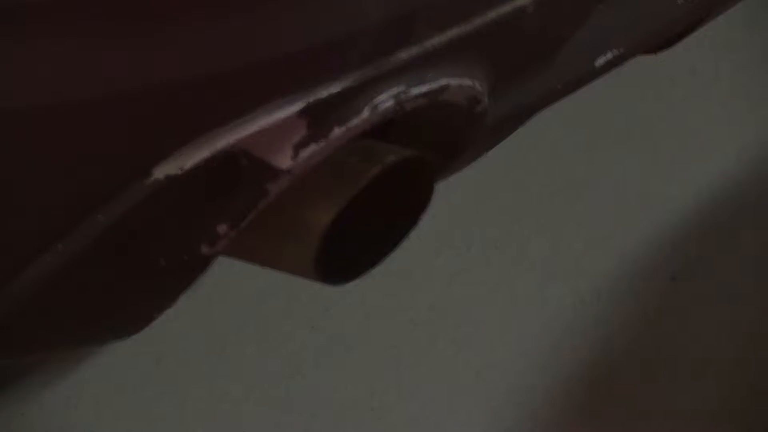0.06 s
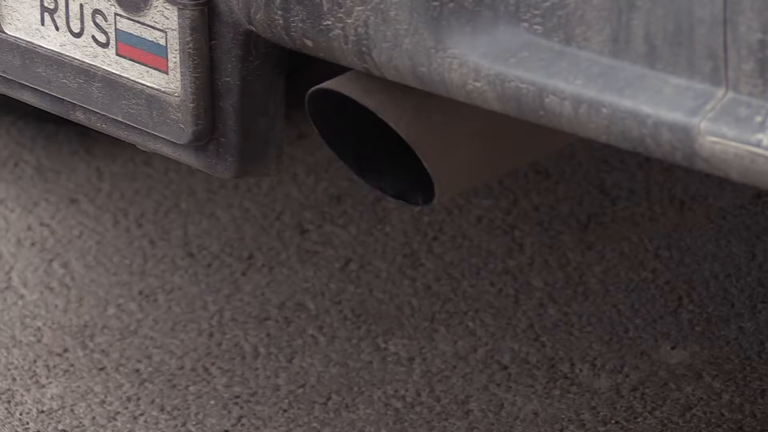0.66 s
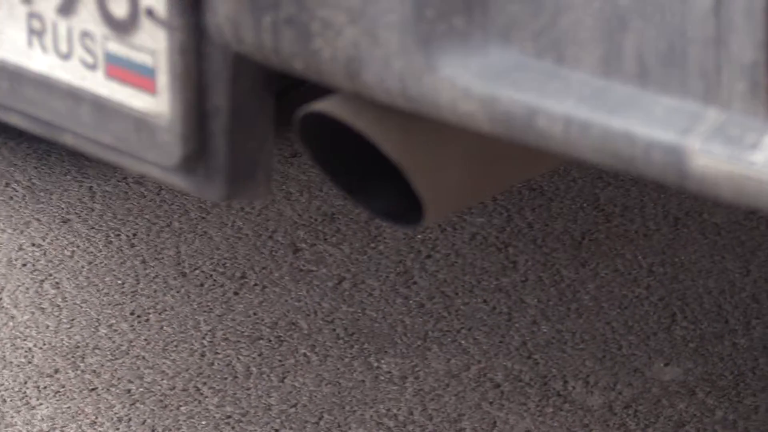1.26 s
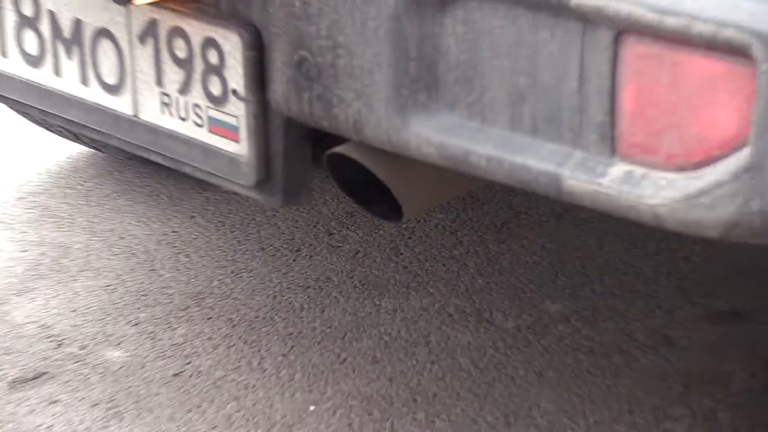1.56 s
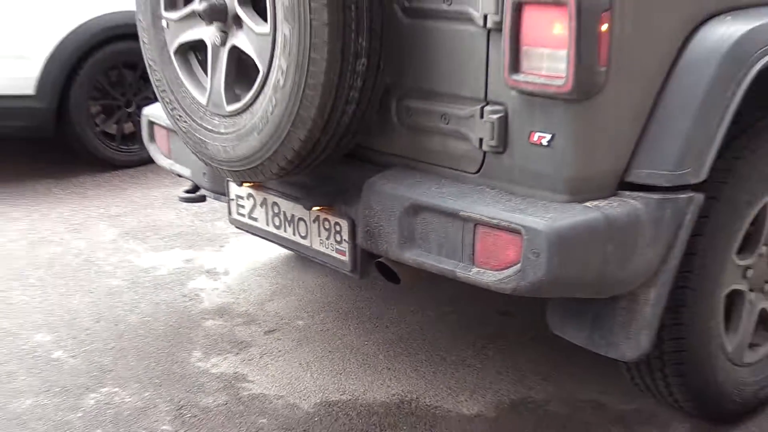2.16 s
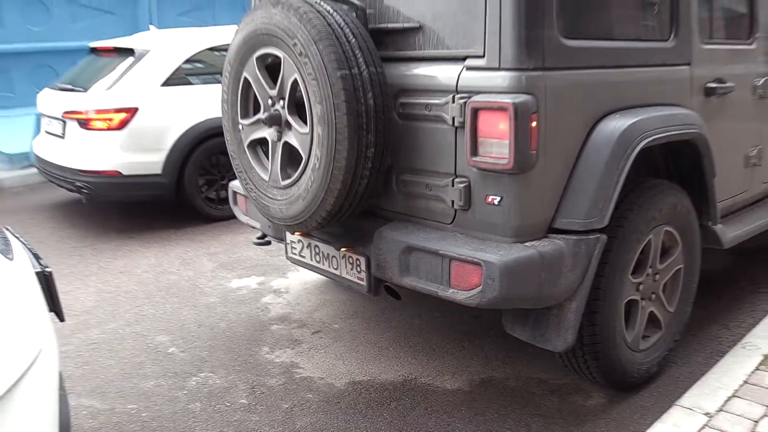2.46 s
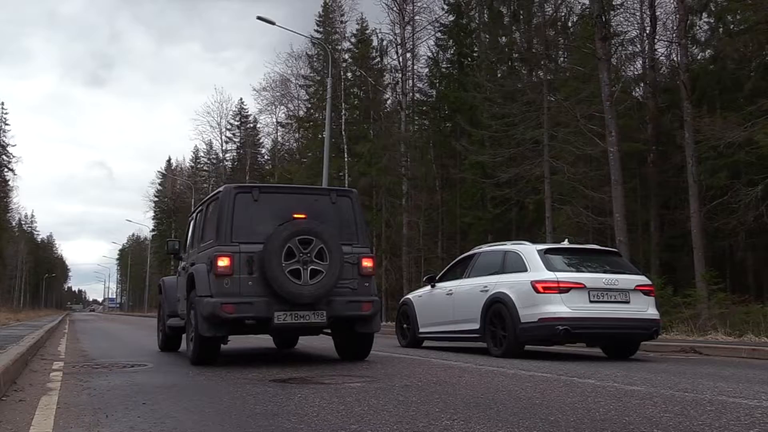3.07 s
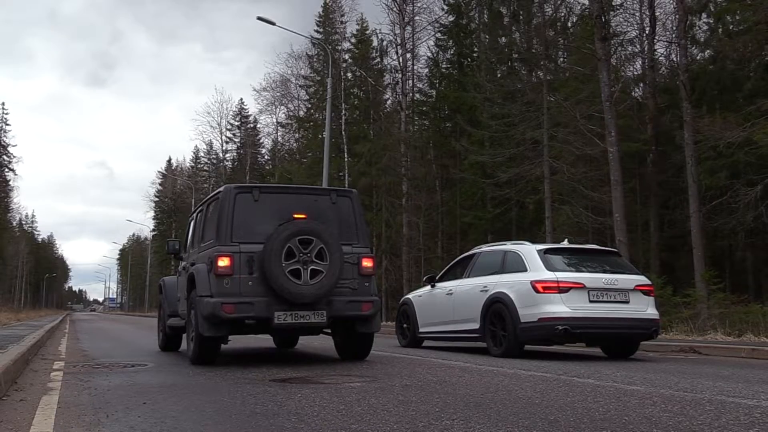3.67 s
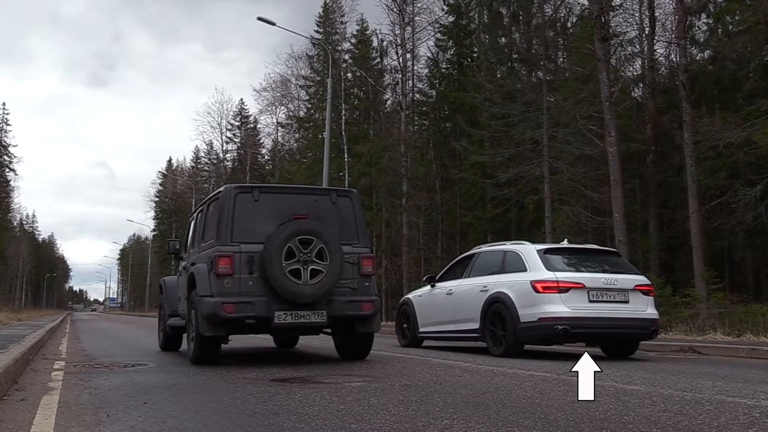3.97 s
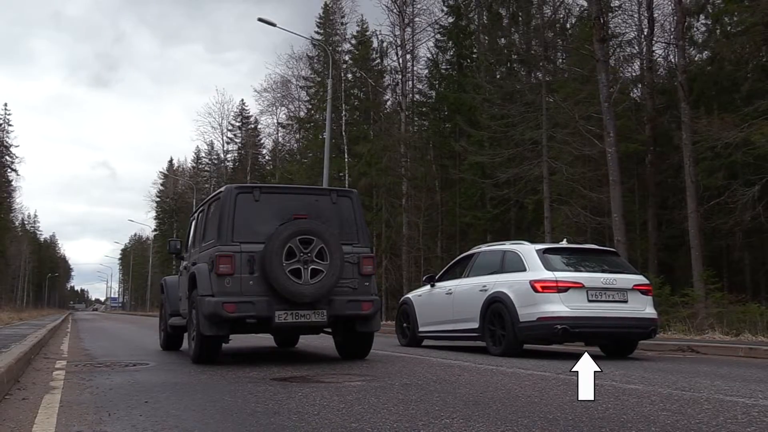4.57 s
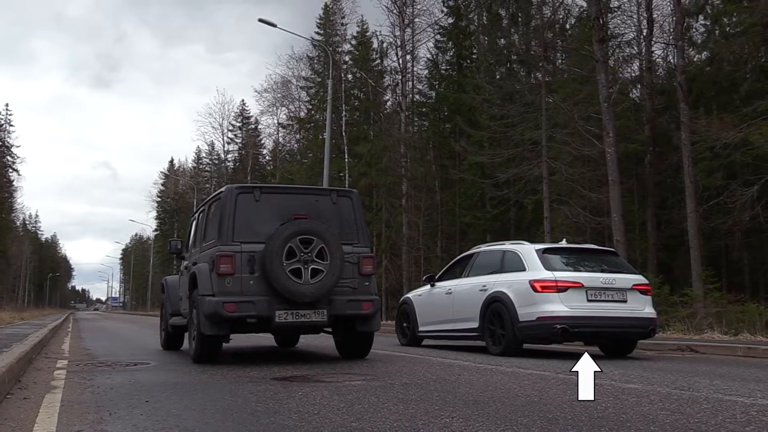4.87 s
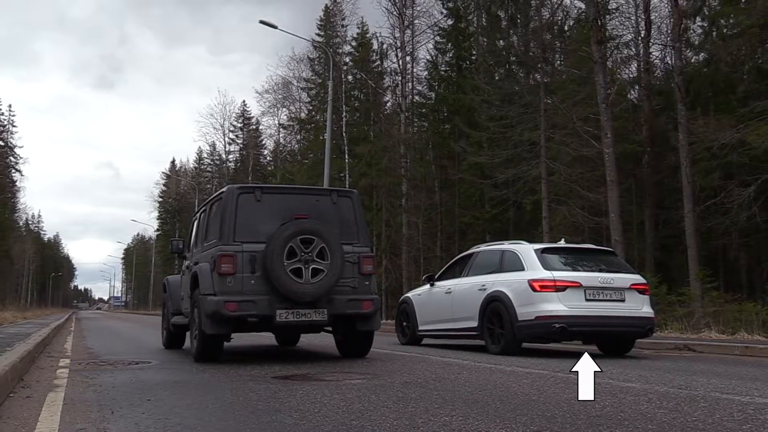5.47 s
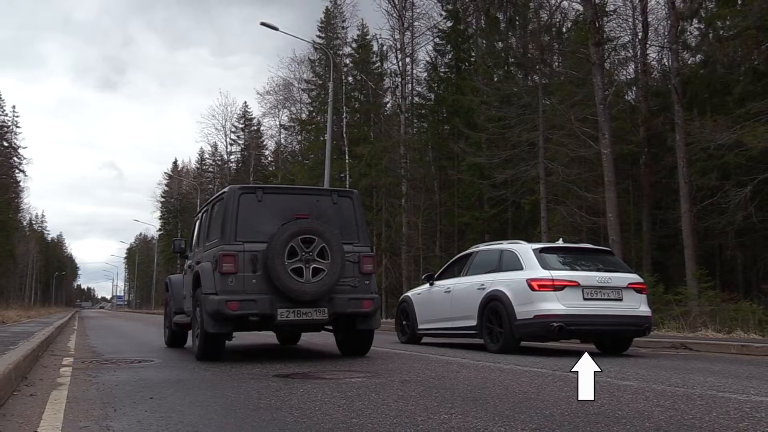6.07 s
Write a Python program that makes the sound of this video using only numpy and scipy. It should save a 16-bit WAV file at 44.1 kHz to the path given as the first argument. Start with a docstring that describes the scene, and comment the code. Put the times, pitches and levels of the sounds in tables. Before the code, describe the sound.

A loud four-cylinder car with an open exhaust idles in a garage, a deep, round throb over an even rush of gas. At about 0.6 seconds it cuts abruptly to a faster, crackling idle close to another tailpipe, with a few harder cracks. At 2.9 seconds another cut leads to a forest road and a quieter, slower idle, softly thudding with a faint whine, heard from farther back. At 3.7 seconds the engine revs with a boom and a bark, peaking near 4.2 seconds, then sinks, with a brief faint whine around 4.8. A second, higher rev starts at 5.2 seconds and peaks near 5.7. Both carry a thin, fuzzy turbo whistle and hiss, the second with a few tiny air spits. One exhaust pop sounds at 5.8 seconds, lightly echoed by the trees, and the engine winds down until about 6.3 seconds.

```python
"""A deep idle throbs in a garage. Cut to a fast, crackling idle at the tailpipe. Cut to a forest road:
a slow idle, revved twice, with turbo whistle and one pop as the throttle shuts the second time.
All three are turbocharged four-cylinder cars with open exhausts. At idle each firing kicks the pipe
and puffs out turbulent gas; in the revs, harmonics of the firing rate sweep the pipe's resonances."""
import sys
import numpy as np
from scipy import signal
from scipy.fft import rfft, irfft, next_fast_len
from scipy.io import wavfile
from scipy.ndimage import uniform_filter1d, minimum_filter1d

SR = 44100
rng = np.random.default_rng(int(sys.argv[2]) if len(sys.argv) > 2 else 0)


def wav_record(signal):
    """Record a signal, one row per channel, as 16-bit PCM in the file named by sys.argv[1]."""
    frames = np.transpose(np.atleast_2d(signal))
    bounded = np.clip(frames, -1, 1)
    # unit amplitude maps onto the largest positive 16-bit level
    quanta = np.round(bounded * 32767).astype(np.int16)
    wavfile.write(sys.argv[1], SR, quanta)


N = 279147
T = np.arange(N) / SR
MID_FIRING_HZ = 80

# exhaust pulse spectra: freq_hz, gain_db
GARAGE_PULSE = [(20, -71), (41, -13), (82, -0.5), (124, 7.5), (165, 7.5), (206, -6.5), (248, -16),
                (300, -29.5), (480, -29.5), (630, -22), (5000, -115)]
FAST_PULSE = [(25, -55.5), (48, -23.5), (96, 0), (144, -2), (192, 3.5), (240, -2), (288, -17), (336, -12.5),
              (384, -16), (450, -28), (730, -22.5), (816, -19), (930, -22.5), (1008, -22.5), (1080, -44),
              (1310, -32), (1600, -37), (1780, -30.5), (2100, -67), (10000, -115)]
SLOW_PULSE = [(25, -38), (51, -9.5), (100, -4.5), (155, 2), (200, -5.5), (270, -12), (330, -2),
              (420, -35.5), (1100, -25), (9000, -110)]
POP_PULSE = [(40, -5), (250, 14.5), (700, 4), (1500, -31), (5000, -59)]
# exhaust gas noise spectra: freq_hz, density_db
GARAGE_GAS = [(20, -20), (130, 5), (300, -6.5), (480, -11.5), (740, -10), (920, -16), (2000, -21),
              (8500, -37.5), (15000, -51)]
FAST_GAS = [(20, -5.5), (100, -1.5), (370, 1), (500, -5.5), (1150, -7.5), (2500, -18.5), (4600, -24.5),
            (6000, -31.5), (10500, -34), (15000, -46)]
SLOW_GAS = [(35, -24.5), (70, 14.5), (160, 13.5), (250, -3.5), (350, 2), (600, -7.5), (1900, -10.5),
            (4000, -24), (9300, -39), (14000, -56)]
REV_GAS = [(30, -15), (150, 15.5), (2400, -3.5), (4200, -11), (5500, -13), (7000, -22), (10000, -32),
           (14500, -48)]
BURBLE_GAS = [(30, -28), (130, 3), (350, 7.5), (700, 0.5), (1250, -10), (6000, -64)]
# resonances in the gas noise: centre_hz, width_hz, lift_db
GARAGE_RESONANCES = [(2280, 120, 6), (3780, 320, 6), (7540, 460, 3.5)]
FAST_RESONANCES = [(574, 68, 5.9), (810, 85, 5.4), (1776, 58, 4.2), (2233, 35, 11.3), (2954, 85, 8.8),
                   (3225, 160, 6), (3960, 100, 7.9), (4720, 120, 4.6), (7160, 400, 6.4)]
REV_RESONANCES = [(2040, 220, 3), (3310, 470, 3.5)]
# echoes in the pipe and under the car: delay_s, gain
GAS_ECHOES = [(.0047, .22), (.0083, .2), (.0131, .17)]

# fast idle speed: time_s, firing_hz
FAST_SPEED = [(.642, 46.96), (.9, 48.29), (1.3, 47.83), (2.65, 48.1), (2.9, 48.47)]
# firings that crack harder: time_s, extra_db
HARD_CRACKS = [(.956, 6), (2.083, 6), (2.353, 4.5), (2.852, 2)]
# gas bands that burst out at each firing: freq_hz, gain_db
CRACK_BAND = [(200, -14.5), (1900, 7.5), (7000, -17)]
SPIT_BAND = [(600, -24.5), (2500, 6.5), (4700, 6.5), (6500, -3.5)]
# reflections along the tailpipe: delay_s, gain
PIPE_ECHOES = [(.0052, 0.29), (.0104, -0.16)]
# slow idle whine: pitch_hz, level_db
IDLE_WHINE = [(527.6, -43), (1055, -47)]

# throttle stabs: open_s, close_s, bark_db, boom_dip_db
STABS = [(3.676, 4.16, 3, -2), (5.198, 5.696, 3.2, -4.5)]
# speed through the revs: time_s, firing_hz
REV_SPEED = [(3.74, 31.4), (3.82, 46), (3.9, 61.8), (3.96, 69.1), (4.03, 76.6), (4.15, 83.7), (4.21, 82.6),
             (4.3, 77.8), (4.38, 77.7), (4.6, 68.6), (4.9, 57.2), (5.19, 46.3), (5.3, 65), (5.45, 87.8),
             (5.59, 111.1), (5.65, 117.8), (5.88, 111.6), (6.33, 92.4)]
# pipe response at the firing rate: freq_hz, level_db
BOOM = [(35, -49), (50, -29), (66, -23), (78, -16), (95, -14), (118, -16.5)]
# pipe response for higher orders, hot under load, cooler coasting: freq_hz, gain_db
LOADED_PIPE = [(30, -68), (65, -27.5), (100, -21.5), (143, -8.5), (175, -9.5), (215, -14), (258, -5.5),
               (320, -15.5), (380, -14.5), (440, -15), (500, -9.5), (600, -9), (780, -11), (1000, -13),
               (1300, -14.5), (3000, -51.5)]
COASTING_PIPE = [(30, -62.5), (100, -31.5), (124, -18), (145, -28.5), (205, -27.5), (245, -25),
                 (297, -15.5), (340, -20), (380, -15), (450, -23.5), (520, -12), (570, -21.5), (650, -12.5),
                 (740, -23), (830, -21.5), (1400, -18), (3000, -48.5)]
# gas level laws: mid_speed_coasting_db, speed_db_per_octave, load_db, boost_db
BURBLE_LAW = (-32, 8, 5, 2)
RUSH_LAW = (-28, 8.5, 3, -3)

# turbo whistle and hiss contour: time_s, pitch_hz, relative_db
TURBO = [(3.75, 8800, -68), (3.92, 8950, -51), (4.06, 9440, -63), (5.18, 9230, -66), (5.36, 9017, -60),
         (5.6, 9950, -53), (5.8, 10000, -79)]
# air spits under boost: start_s, peak_db
BOOST_SPITS = [(5.5005, -40), (5.5225, -39), (5.541, -35)]
# air noise spectra: freq_hz, density_db
BOOST_AIR = [(3500, -44), (5500, -1), (8500, 6), (16000, -9.5)]
VENT_AIR = [(500, -38), (1450, 1), (3300, -2), (4500, -16), (9000, -35)]
# stereo balance: freq_hz, left_minus_right_db
BALANCE = [(60, 2.5), (180, 1), (600, 0.5), (1300, -1.4), (2800, 0), (6000, -1.7)]


def amp(db):
    """Decibels to gain."""
    return 10 ** (np.asarray(db) / 20)


def unit(x):
    """Scale to rms 1."""
    return x / np.sqrt(np.mean(x ** 2) + 1e-20)


def db_at(spectrum, hz):
    """Spectrum interpolated on a log frequency axis."""
    freq_hz, db = np.transpose(spectrum)
    return np.interp(np.log(hz + 1), np.log(freq_hz + 1), db)


def curves(rows):
    """Columns of a timed table at every sample."""
    time_s, *columns = np.transpose(rows)
    return [np.interp(T, time_s, column) for column in columns]


def colour(x, gain_db):
    """Zero-phase filter; gain_db is a function of frequency."""
    size = next_fast_len(N)
    return irfft(rfft(x, size) * amp(gain_db(np.fft.rfftfreq(size, 1 / SR))), size)[..., :N]


def lift_db(resonances, hz):
    """Summed resonance peaks."""
    return sum(db / (1 + (2 * (hz - centre_hz) / width_hz) ** 2) for centre_hz, width_hz, db in resonances)


def echoed(pair, echoes):
    """Stereo signal plus delayed copies."""
    return pair + sum(gain * np.roll(pair, round(delay_s * SR), axis=1) for delay_s, gain in echoes)


def gas(spectrum, resonances=(), correlation=.38):
    """Turbulent stereo noise with resonances and short echoes."""
    mid, side = rng.standard_normal((2, N))
    pair = np.sqrt(1 + correlation) * mid + np.sqrt(1 - correlation) * np.array([side, -side])
    return unit(colour(echoed(pair, GAS_ECHOES), lambda f: db_at(spectrum, f) + lift_db(resonances, f)))


def pipe_response(spectrum, size=8192):
    """Exhaust pipe per FFT bin: log gain (real), causal phase (imaginary)."""
    log_gain = np.log(amp(db_at(spectrum, abs(np.fft.fftfreq(size, 1 / SR)))))
    return np.conj(signal.hilbert(log_gain))


def ring(drive, spectrum):
    """The pipe rings in response to a drive."""
    impulse_response = np.fft.ifft(np.exp(pipe_response(spectrum))).real
    return signal.oaconvolve(drive, impulse_response)[:N]


def firings(rate_hz, first_s, uneven, scatter, swing_s):
    """One kick per firing, alternately strong and late, weak and early; no two match."""
    cycles = np.cumsum(rate_hz * np.ones(N)) / SR
    cycles -= np.interp(first_s, T, cycles)
    at = np.flatnonzero(np.diff(np.floor(cycles)))
    size, late = rng.standard_normal((len(at), 2)).T
    alternate = -(-1) ** np.round(cycles[at])
    shift = np.round(swing_s * SR * (alternate + .5 * late)).astype(int)
    kicks = np.zeros(N)
    kicks[np.clip(at + shift, 0, N - 1)] = 1 + uneven * alternate + scatter * size
    return kicks


def puffs(kicks, rise_s, lead_s, spread_db=.5):
    """Envelope of the gas bursts: one per kick, random in strength."""
    age = T[:SR // 20] / rise_s
    sizes = kicks * amp(-spread_db * rng.standard_normal(N))
    return np.interp(T + lead_s, T, signal.oaconvolve(sizes, age * np.exp(1 - age))[:N])


def whistle(hz, db, width_hz):
    """Narrow noise band following a pitch and a level."""
    flutter = colour(rng.standard_normal(N), lambda f: -20 * np.log10(1 + (f / width_hz) ** 2))
    return amp(db) * unit(flutter * np.cos(2 * np.pi * np.cumsum(hz) / SR))


def garage_idle():
    """Round throb of exhaust pulses; the garage smears the gas bursts into a nearly even rush."""
    kicks = firings(rate_hz=41.33, first_s=.016, uneven=.008, scatter=.012, swing_s=.00002)
    surge = 1 + .4 * puffs(kicks, rise_s=.003, lead_s=.005)
    rush = gas(GARAGE_GAS, GARAGE_RESONANCES, correlation=.72) * surge
    return amp(-6.5) * unit(-ring(kicks, GARAGE_PULSE)) + amp(-25) * unit(rush)


def tailpipe(envelope, band, correlation):
    """Gas bursts ring the fast idle's pipe and echo along it."""
    hz = np.linspace(0, SR / 2, 4097)
    gain_db = db_at(FAST_GAS, hz) + db_at(band, hz) + lift_db(FAST_RESONANCES, hz)
    bursts = gas([(20, 0)], correlation=correlation) * envelope
    rung = np.array([ring(channel, np.c_[hz, gain_db]) for channel in bursts])
    return unit(echoed(rung, PIPE_ECHOES))


def fast_idle():
    """Hard pulses ring the tailpipe, each with a gas crack in front and a softer spit behind."""
    kicks = firings(curves(FAST_SPEED)[0], first_s=.6633, uneven=.05, scatter=.015, swing_s=.00004)
    force = kicks ** 2 * amp(sum(db * (abs(T - time_s) < .008) for time_s, db in HARD_CRACKS))
    front = puffs(force, rise_s=.0013, lead_s=.0016, spread_db=1)
    behind = puffs(force, rise_s=.0016, lead_s=.0004, spread_db=2)
    crack = tailpipe(front, CRACK_BAND, correlation=.68)
    spit = tailpipe(behind, SPIT_BAND, correlation=.96)
    rush = gas(FAST_GAS, FAST_RESONANCES, correlation=.89)
    pulses = unit(ring(kicks, FAST_PULSE))
    return amp(-9) * pulses + amp(-28.5) * crack + amp(-36) * spit + amp(-26.5) * rush


def slow_idle():
    """Soft exhaust thuds and a whine give way to the first rev; the gas rush stays."""
    kicks = firings(rate_hz=25.34, first_s=2.9372, uneven=.04, scatter=.04, swing_s=.00007)
    thuds = unit(-ring(kicks, SLOW_PULSE))
    idling = np.interp(T, [3.7, 3.8], [1, 0])
    rush = gas(SLOW_GAS, correlation=.87)
    rush *= 1 + .87 * idling * puffs(kicks, rise_s=.0011, lead_s=.0034)
    whine = sum(amp(db) * np.sin(2 * np.pi * hz * T) for hz, db in IDLE_WHINE)
    return idling * (amp(-27) * thuds + whine) + amp(-28) * unit(rush)


def chirp(peak_s=3.595, top_hz=4400, bend_hz=1100, half_s=.018, peak_db=-52, fade_db=3):
    """Faint chirp arching up and down, perhaps a brake letting go."""
    drop = np.minimum(((T - peak_s) / half_s) ** 2, 3)
    gate = np.minimum(3 - drop, 1)
    return gate * whistle(top_hz - bend_hz * drop, peak_db - fade_db * drop, width_hz=110)


def throttle(open_s=.046, shut_s=.14, boost_lag_s=.12, spool_s=.17, surge_db=5, lull_db=-17.5):
    """Load and boost, 0-1. The bark surges as boost comes in; bark and boom dip on closing."""
    load, boost, accent_db, dip_db = np.zeros((4, N))
    for start_s, close_s, bark_db, boom_dip_db in STABS:
        stab = np.clip((T - start_s) / open_s, 0, 1) * np.clip(1 - (T - close_s) / shut_s, 0, 1)
        surge = np.exp(-((T - start_s - .27) / .061) ** 2)
        lull = np.exp(-((T - close_s - .063) / .029) ** 2)
        load += stab
        boost += stab * np.clip((T - start_s - boost_lag_s) / spool_s, 0, 1)
        accent_db += bark_db * stab + surge_db * surge + lull_db * lull
        dip_db += boom_dip_db * lull
    return load, boost, accent_db, dip_db


def firing_orders(cycles, hz, load, boost, accent_db, dip_db, jitter_rad=.01, hot_shift=.047):
    """Boom (order 1) and bark (higher orders) through the pipe; each firing varies a little."""
    draws = rng.standard_normal((512, 3)).T
    boom_scatter, bark_scatter, jitter = (np.interp(cycles, np.arange(512), row) for row in draws)
    loaded, coasting = pipe_response(LOADED_PIPE), pipe_response(COASTING_PIPE)
    bin_hz = np.arange(len(loaded)) * SR / len(loaded)
    # duller under load until boost; faster firings have steeper fronts
    db_per_octave = -11 - 2.5 * (load - boost) + 2.4 * np.log2(hz / MID_FIRING_HZ)
    tones = 0
    for order in range(1, 29):
        response = load * np.interp(order * hz, bin_hz, loaded)
        response += (1 - load) * np.interp(order * hz, bin_hz, coasting)
        bark = min((order - 1) / 4, 1)
        if order == 1:  # hot gas raises the boom's resonance
            gain = amp(db_at(BOOM, hz / (1 + hot_shift * load)) + dip_db)
        else:
            gain = np.exp(response.real) * amp(db_per_octave * np.log2(order / 2) + bark * accent_db)
        roughness = 1 + .08 * (1 - bark) * boom_scatter + .1 * bark * bark_scatter
        phase = 2 * np.pi * order * cycles + response.imag + order * jitter_rad * jitter
        tones += gain * roughness * np.sin(phase)
    return np.sqrt(2) * tones


def gas_level_db(law, hz, load, boost):
    """Gas noise level from speed, load and boost."""
    base_db, db_per_octave, load_db, boost_db = law
    return base_db + db_per_octave * np.log2(hz / MID_FIRING_HZ) + load_db * load + boost_db * boost


def revs(start_s=3.7, fade_in_s=.08):
    """Firing orders sweep the pipe's resonances; gas burbles and rushes with each firing."""
    hz, = curves(REV_SPEED)
    load, boost, accent_db, dip_db = throttle()
    cycles = np.cumsum(hz) / SR
    live = T > start_s
    tones = np.zeros(N)
    tones[live] = firing_orders(*(curve[live] for curve in (cycles, hz, load, boost, accent_db, dip_db)))
    # cylinders pull unevenly off throttle
    lope = 1 + .034 * (1 - load) * MID_FIRING_HZ / hz * np.cos(np.pi * cycles / 2)
    burst = np.exp(1.5 * (np.cos(2 * np.pi * (cycles - .12)) - 1))
    burble = unit(gas(BURBLE_GAS, correlation=.94) * (.6 + burst))
    burble *= amp(gas_level_db(BURBLE_LAW, hz, load, boost) + accent_db)
    rush = unit(gas(REV_GAS, REV_RESONANCES, correlation=.65) * (1 + .3 * burst))
    rush *= amp(gas_level_db(RUSH_LAW, hz, load, boost))
    return (lope * tones + burble + rush) * np.clip((T - start_s) / fade_in_s, 0, 1)


def turbo(hiss_offset_db=1, spit_decay_s=.003):
    """Fuzzy whistle and air hiss swell in each rev; thin spits top the second."""
    pitch_hz, contour_db = curves(TURBO)
    tone = .6 * whistle(pitch_hz, contour_db, width_hz=330)
    hiss = amp(contour_db + hiss_offset_db)
    spits = sum(amp(peak_db) * (T > start_s) * np.exp(-abs(T - start_s) / spit_decay_s)
                for start_s, peak_db in BOOST_SPITS)
    return tone + (hiss + spits) * gas(BOOST_AIR)


def belt_whine(order=15.7, peak_s=4.79, peak_db=-35.5, fade_db_per_s=91):
    """Whine geared to the engine, perhaps the belt drive; surfaces once as speed falls."""
    level_db = peak_db - fade_db_per_s * abs(T - peak_s)
    return whistle(order * curves(REV_SPEED)[0], level_db, width_hz=22)


def pop(start_s=5.7975, peak_db=-3):
    """Unburnt fuel fires in the pipe as the throttle shuts."""
    bang = ring(signal.unit_impulse(N, round(start_s * SR)), POP_PULSE)
    return -amp(peak_db) * bang / abs(bang).max()


def boost_vent(end_db=-71.1, rise_db_per_s=46):
    """Venting boost air: a very faint hiss, swelling to the end."""
    return amp(end_db + rise_db_per_s * (T - T[-1])) * gas(VENT_AIR, correlation=1)


def forest(x, t60_s=.7, wet_db=-22):
    """Dull, scattered echoes from trees; bass alike in both channels."""
    t = T[:SR]
    mid, side = rng.standard_normal((2, SR)) * amp(-60 * t / t60_s) * (t > .03)
    side = signal.lfilter(*signal.butter(1, 700, "high", fs=SR), side)
    tail = np.array([mid + side, mid - side]) / np.linalg.norm(mid)
    echo = signal.fftconvolve(x, tail, axes=1)[:, :N]
    return x + amp(wet_db) * colour(echo, lambda f: db_at([(80, -8), (400, 0), (2000, 0), (8000, -8)], f))


def scene(cuts_s=(.6415, 2.891)):
    """Garage, tailpipe and forest road in turn."""
    road = slow_idle() + forest(revs() + turbo() + boost_vent() + pop() + belt_whine() + chirp())
    cars = garage_idle(), fast_idle(), road
    playing = np.searchsorted(cuts_s, T)
    left, right = sum(car * uniform_filter1d(1. * (playing == k), size=64) for k, car in enumerate(cars))
    return np.array([colour(left, lambda f: db_at(BALANCE, f) / 2),
                     colour(right, lambda f: -db_at(BALANCE, f) / 2)])


def record(dry, ceiling=.92, low_cut_hz=30, high_cut_hz=15400):
    """Fast peak limiter, low cut, high cut."""
    allowed = np.minimum(1, ceiling / (abs(dry).max(0) + 1e-9))
    held = minimum_filter1d(allowed, size=80)
    gain = uniform_filter1d(uniform_filter1d(held, size=60), size=40)
    thinned = colour(dry * gain, lambda f: -10 * np.log10(1 + (low_cut_hz / (f + 1)) ** 6))
    lowpass = signal.firwin(511, high_cut_hz, window=("kaiser", 9), fs=SR)
    return signal.oaconvolve(thinned, lowpass[None], "same")


dry = scene()
out = record(dry)
wav_record(out)
```